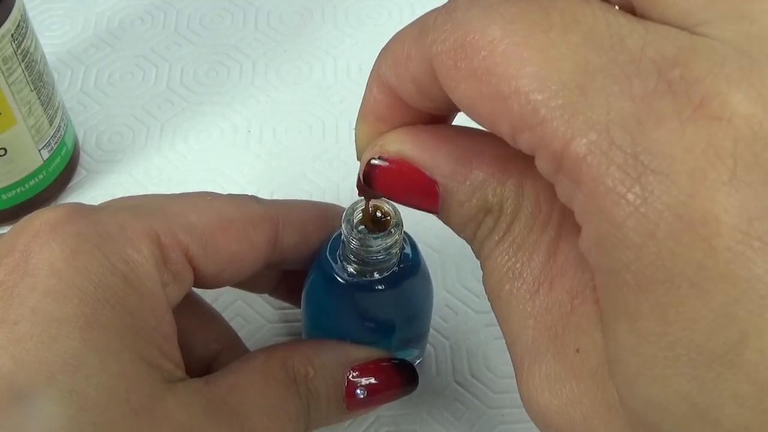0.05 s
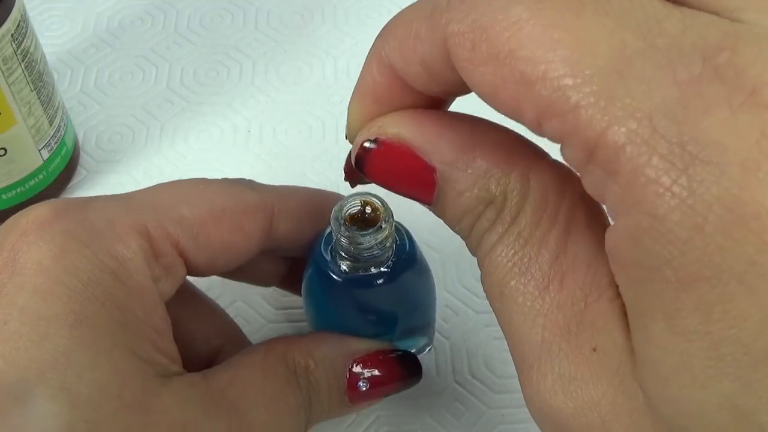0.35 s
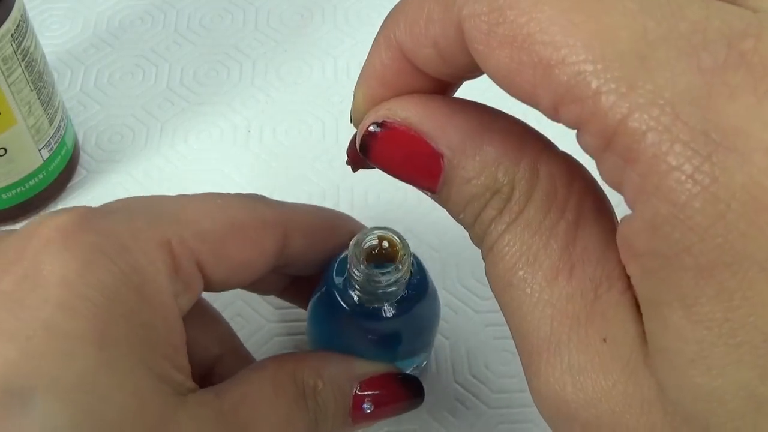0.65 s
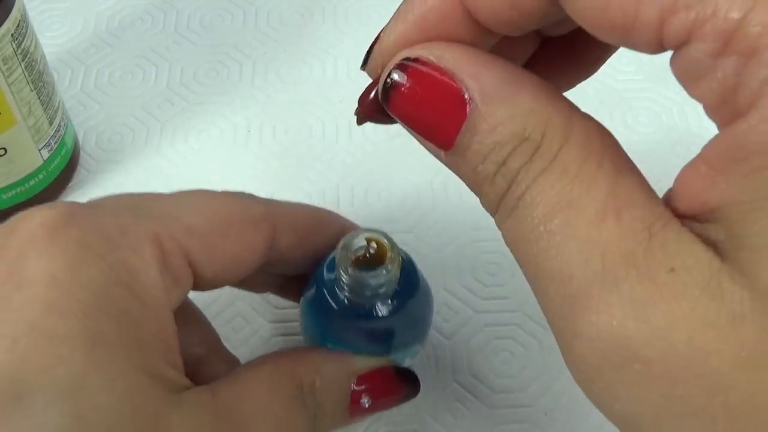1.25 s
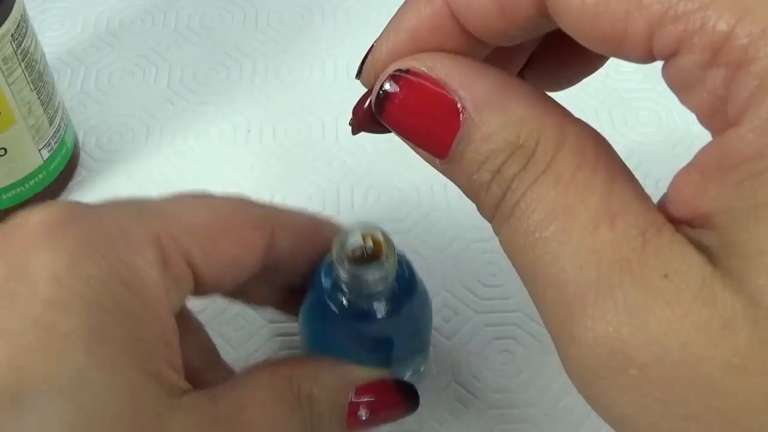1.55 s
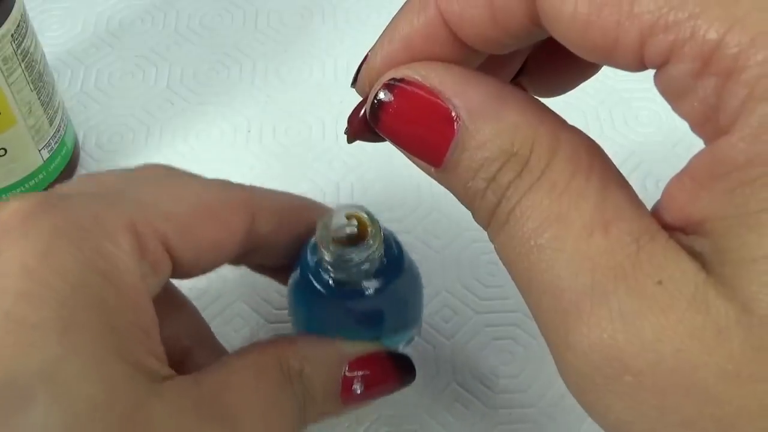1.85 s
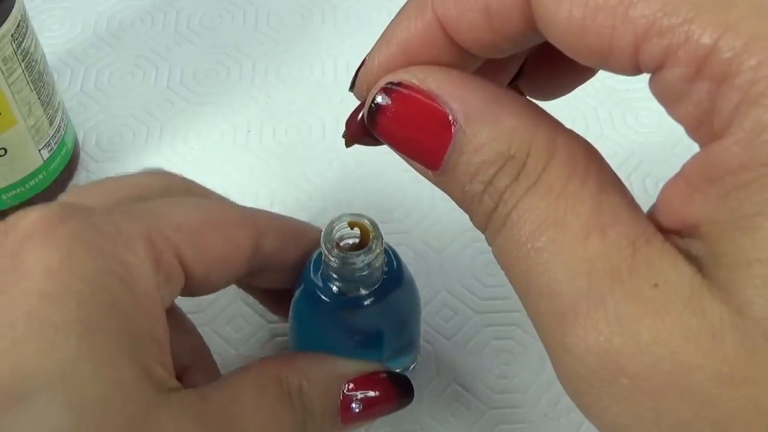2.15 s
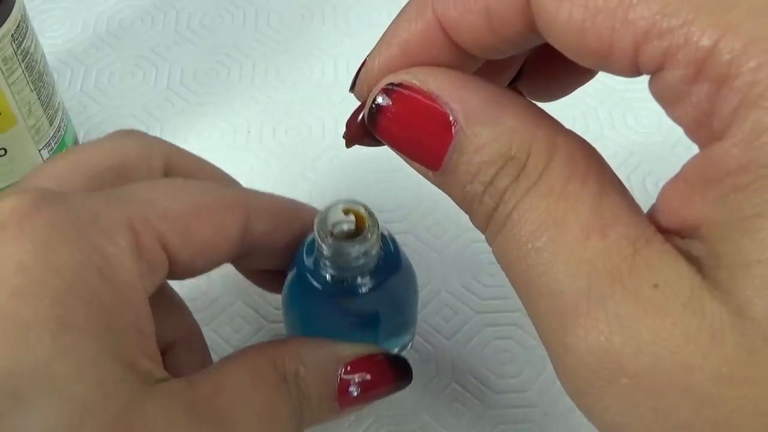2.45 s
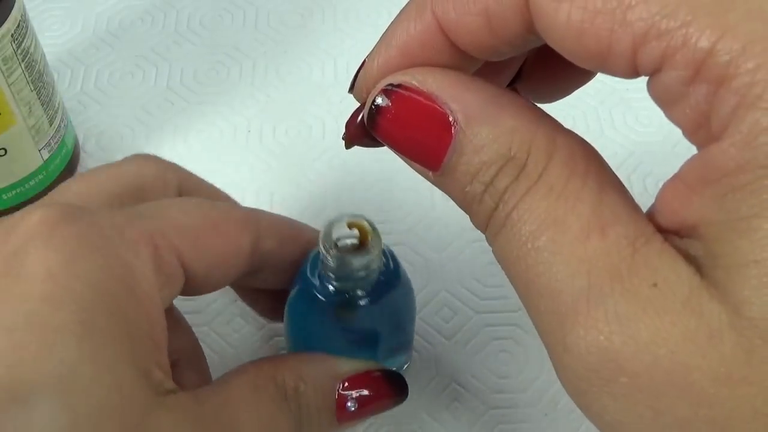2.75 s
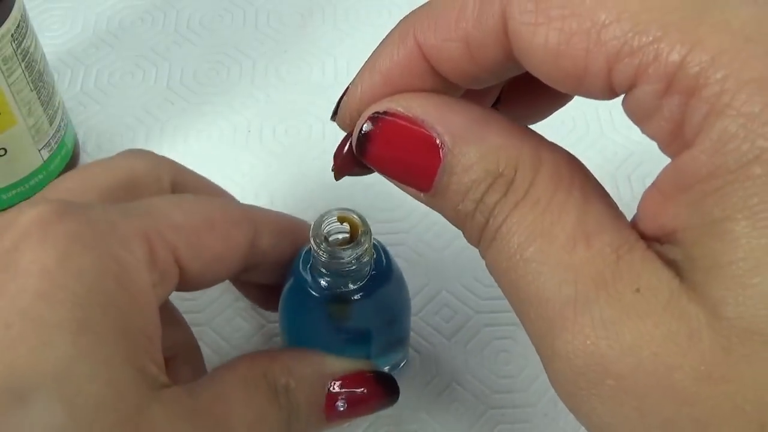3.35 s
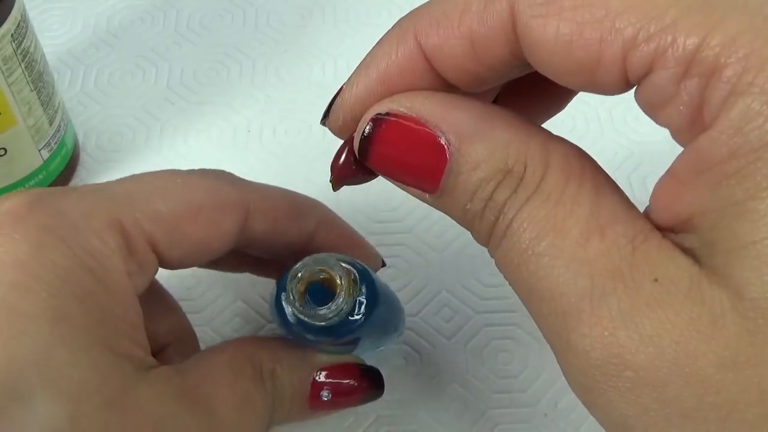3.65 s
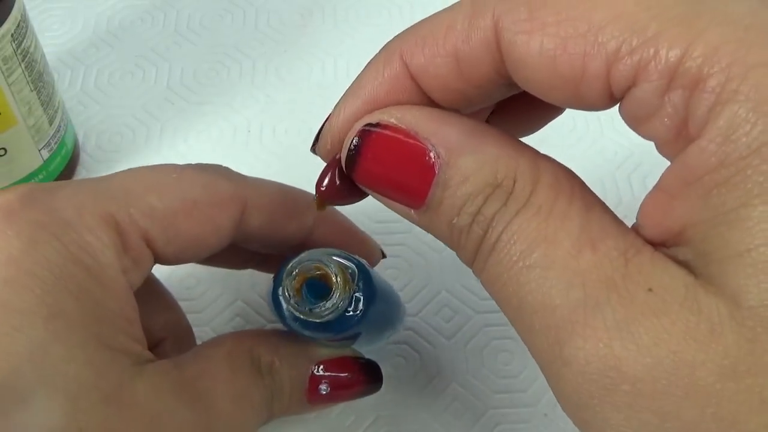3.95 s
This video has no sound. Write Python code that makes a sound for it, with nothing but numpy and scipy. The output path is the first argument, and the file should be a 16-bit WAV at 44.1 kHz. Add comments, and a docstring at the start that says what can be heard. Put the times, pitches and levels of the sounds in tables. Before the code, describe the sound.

A small glass bottle taps on a table covered with a paper towel, heard close up. The taps start softly at about 0.7 seconds and come five times a second, each a hollow thump with a light tick and a faint paper crinkle. They grow louder, peak near 3 seconds and stop around 3.2. A finger gives one short, dull rub at 3.6. Faint room hiss and buzz continue throughout.

```python
"""Over a faint hiss and buzz, a small glass nail-polish bottle taps about five times a second.
It lands on a table covered with a paper towel: the glass gives a short tick and the tabletop rings
with a hollow thump. The paper crinkles each time the bottle lifts. At the end a finger shifts on it.
The room is small and quiet; the hiss comes from the room and the camera, the buzz from the camera."""
import sys
import numpy as np
from scipy import signal
from scipy.fft import rfft, irfft, next_fast_len
from scipy.io import wavfile

SR = 44100
rng = np.random.default_rng(int(sys.argv[2]) if len(sys.argv) > 2 else 0)


def output_pcm(signal):
    """Save a mono or channel-first signal as 16-bit PCM at the path in sys.argv[1].

    Samples are clipped to [-1, 1] before scaling.
    """
    pcm = np.clip(np.atleast_2d(signal).T, -1, 1) * 32767
    wavfile.write(sys.argv[1], SR, np.round(pcm).astype(np.int16))


N = 176400

# The bottle's taps. Each row: start in seconds, thump level in dB, tick level in dB,
# crinkle level in dB, hardness as extra dB for the tabletop's higher tones.
TAPS = [(0.6765, -24, -41.5, -59.5, -6.5), (.850, -40, -49, -66, -6), (1.0724, -18.5, -38.5, -61, -1.5),
        (1.2749, -17, -37.5, -58.5, -0.5), (1.4635, -22.5, -40.5, -60.5, -4),
        (1.6506, -10.5, -31, -57, 6.5), (1.8529, -14, -33, -58, 3.5), (2.0452, -15.5, -36.5, -60, -2),
        (2.244, -10.5, -33.5, -54.5, 1.5), (2.4379, -15.5, -33, -62, -6), (2.6218, -15, -34.5, -57.5, -1),
        (2.8303, -10, -29.5, -56.5, 3), (3.0318, -6.5, -33, -53, 4), (3.2225, -9.5, -31.5, -59.5, -1)]


def amp(db):
    """Turn decibels into a number to multiply by."""
    return 10 ** (np.asarray(db) / 20)


def unit(x):
    """Scale a sound to an average (rms) level of 1."""
    return x / np.sqrt(np.mean(x ** 2) + 1e-20)


def along(points, hz):
    """Read a curve of (Hz, value) points at hz, on a logarithmic frequency scale."""
    freqs, values = np.transpose(points)
    return np.interp(np.log(hz + 1), np.log(freqs + 1), values)


def filtered(x, response):
    """Multiply each frequency in x by response(hz)."""
    size = next_fast_len(N + SR // 2)
    return irfft(rfft(x, size) * response(np.fft.rfftfreq(size, 1 / SR)), size)[..., :N]


def noise(colour):
    """Noise of level 1, its tone colour shaped by (Hz, dB) points."""
    return unit(filtered(rng.standard_normal(N), lambda hz: amp(along(colour, hz))))


def stereo(mid, side):
    """Make left and right from what they share (mid) and how they differ (side)."""
    return np.array([mid + side, mid - side])


def add(track, start, sound):
    """Mix a sound into a track at start seconds."""
    part = track[max(round(start * SR), 0):][:len(sound)]
    part += sound[:len(part)]


def bursts(events, t60, colour, side_db, rise_s=0.0004):
    """A burst of noise for each (seconds, dB) event; t60 is the seconds it takes to fade by 60 dB."""
    level, t = np.zeros(N), np.arange(SR // 5) / SR
    for start, db in events:
        add(level, start, (1 - np.exp(-t / rise_s)) * amp(db - 60 * t / t60))
    return level * stereo(noise(colour), amp(side_db) * noise(colour))


def hiss(level_db=-55):
    """The room and the microphone make a soft, steady noise."""
    # Each row: frequency in Hz, relative level in dB.
    colour = [(13, -37), (22, -19), (55, -3.5), (79, -9.5), (97, -22.5), (143, -6.5), (211, -18.5),
              (311, -17.5), (471, -22), (509, -21), (677, -24), (1260, -22.5), (1680, -27.5), (2680, -29.5),
              (10900, -39.5), (14200, -79.5), (22000, -120)]
    # Each row: frequency in Hz, how alike left and right are (1 means the same).
    likeness = [(60, 1.0), (170, 1), (480, 0.36), (1370, 0.073), (3890, 0.36), (11000, 0.87)]

    def mid_and_side(hz):
        angle = np.arccos(np.clip(along(likeness, hz), -1, 1)) / 2
        return amp(along(colour, hz)) * [np.cos(angle), np.sin(angle)]

    mid, side = filtered(rng.standard_normal((2, N)), mid_and_side)
    return amp(level_db) * unit(stereo(mid, side))


def hand_rumble():
    """Hands on the table make a low rumble that swells and fades."""
    # Each row: frequency in Hz, relative level in dB.
    colour = [(20, -45), (35, -21), (50, 0), (75, 0), (110, -17), (250, -28), (1000, -96)]
    # Each row: time in seconds, rumble level in dB.
    loudness = [(0, -64), (1.2, -62.5), (2.1, -57.5), (2.75, -50), (3.1, -58), (3.55, -65), (3.72, -49),
                (4, -66)]
    level = amp(np.interp(np.arange(N) / SR, *np.transpose(loudness)))
    return level * stereo(noise(colour), amp(-23) * noise(colour))


def camera_buzz(pulse_hz=29.97, level_db=-72.5, scatter_db=2):
    """Faint, regular pulses make the camera's body ring."""
    # The body's tones. Each row: frequency in Hz, relative level in dB, seconds to fade by 60 dB.
    body_tones = [(2664, 3.5, 0.068), (2702, -3.5, 0.027), (2976, 0.5, 0.056), (3366, 2.5, 0.04),
                  (3467, -1, 0.062)]
    pulses, t = np.zeros(N), np.arange(SR // 10) / SR
    ring = sum(amp(db - 60 * t / t60) * np.sin(2 * np.pi * hz * t) for hz, db, t60 in body_tones)
    for start in np.arange(0, N / SR, 1 / pulse_hz):
        add(pulses, start, amp(scatter_db * rng.standard_normal()) * ring)
    return amp(level_db) * unit(pulses)


def glass_ticks(lead_s=0.0015, firm_tap_db=-9.5):
    """Fingers stop the glass from ringing, so it only ticks and clicks; firmer taps clack louder."""
    # Small clicks of the glass rocking and of nails on it. Each row: start in seconds, level in dB.
    clicks = [(0.523, -52), (0.6534, -37.5), (.9002, -47), (0.9127, -40), (0.9145, -46), (1.006, -50),
              (1.0895, -42), (1.118, -53), (1.3397, -57), (1.51, -45), (1.6726, -37), (1.873, -37),
              (1.9049, -33.5), (2.0943, -40.5), (2.1093, -41), (2.4866, -38), (2.499, -45), (2.674, -43),
              (2.6846, -39), (3.0804, -45), (3.3671, -48.5)]
    # The colour of a tick. Each row: frequency in Hz, relative level in dB.
    glass = [(500, 4.5), (1200, -6), (2400, -16), (3400, -1.5), (4200, -7), (5300, 0), (6800, 2),
             (8000, -0.5), (11000, -11.5)]
    # The colour of a clack through the paper. Each row: frequency in Hz, relative level in dB.
    clack_colour = [(300, -9), (600, -2.5), (900, -1), (1600, -13), (3000, -12), (8000, -35)]
    ticks = [(start - lead_s, db) for start, _, db, _, _ in TAPS]  # just ahead of the thump
    tails = [(start, db - 19) for start, db in ticks]
    tails += [(start, db - 25.5) for start, db in clicks]  # the small clicks are drier
    clacks = [(start, -50 + 1.06 * (db - firm_tap_db)) for start, db, _, _, _ in TAPS]
    return (bursts(ticks, t60=0.011, colour=glass, side_db=-17.5)
            + bursts(clicks, t60=0.01, colour=glass, side_db=-17.5)
            + bursts(tails, t60=0.12, colour=glass, side_db=-6)
            + bursts(clacks, t60=0.09, colour=clack_colour, side_db=0))


def paper_crinkle(lift_delay_s=0.049, spread_s=0.014, snaps_per_s=1000, scatter_db=3.5):
    """Paper fibres spring back in a swell of tiny snaps when the bottle lifts or brushes them."""
    # The bottle brushes the paper. Each row: loudest moment in seconds, level in dB.
    brushes = [(.595, -61.5), (3.55, -61.5)]
    # The colour of the paper. Each row: frequency in Hz, relative level in dB.
    paper = [(500, -6.5), (2000, -4), (3500, -1.5), (5500, -6), (7500, -2), (9500, -4), (11000, -11)]
    t = np.arange(N) / SR
    swells = [(start + lift_delay_s, db) for start, _, _, db, _ in TAPS] + list(brushes)
    level = sum(amp(db) * np.exp(-0.5 * ((t - peak) / spread_s) ** 2) for peak, db in swells)
    sizes = amp(scatter_db * rng.standard_normal((2, N))) * rng.choice([-1, 1], (2, N))
    snaps = sizes * (rng.random((2, N)) < snaps_per_s / SR)
    mid, side = filtered(snaps, lambda hz: amp(along(paper, hz)))
    return level * stereo(unit(mid), amp(-9.5) * unit(side))


def table_thumps(rise_s=0.0054, high_from_hz=365, scatter_db=4.2):
    """Every tap rings the same tabletop; a harder hit brings out its higher tones."""
    # The tones of each thump: mostly the tabletop's, while the long, low ones near 92 and 149 Hz ring in the
    # room. Each row: frequency in Hz, relative level in dB, seconds to fade by 60 dB.
    tones = [(92, -32.5, .42), (114, -10, 0.054), (245.4, 6.5, 0.077), (149.5, -23, 0.45),
             (279.8, -7, 0.12), (164.6, -2.5, 0.09), (388.6, -12, 0.057), (311.2, -26.5, 0.5),
             (530, -12, 0.033), (712.4, -33.5, 0.076), (797, -42.5, 0.081), (346.7, -25, 0.29),
             (590, -46, 0.11), (436, -12, 0.033)]
    thumps, t = np.zeros(N), np.arange(int(0.6 * SR)) / SR
    rings = np.array([(-1) ** (k + 1) * amp(db - 60 * t / t60) * np.sin(2 * np.pi * hz * t)
                      for k, (hz, db, t60) in enumerate(tones)])  # every other wave is flipped
    is_high = np.array([hz > high_from_hz for hz, _, _ in tones])
    for start, db, _, _, hardness_db in TAPS:
        extra_db = hardness_db + scatter_db * rng.standard_normal(len(tones))
        gains = amp(db + is_high * extra_db)
        add(thumps, start, gains @ rings * (1 - np.exp(-t / rise_s)))
    return thumps


def room_echoes(x, low_hz=200, high_hz=470, tail_t60=0.2):
    """The walls send back the band from low_hz to high_hz, and a short, soft wash of echoes follows."""
    # Echoes from the walls. Each row: delay in seconds, level in dB.
    walls = [(.0228, -12.5), (0.0312, -11.5), (0.0454, -17), (0.0915, -25.5), (.0991, -22.5), (0.1185, -27)]
    mid, t = x.copy(), np.arange(SR // 2) / SR
    echo = filtered(x, lambda hz: 1 / (1 + (low_hz / (hz + 1)) ** 6) / (1 + (hz / high_hz) ** 4))
    for delay, db in walls:
        add(mid, delay, amp(db) * echo)
    tails = rng.standard_normal((2, len(t))) * amp(-60 * t / tail_t60)
    tails /= np.linalg.norm(tails[0])
    wash_mid, wash_side = signal.fftconvolve(x[None], tails, axes=1)[:, :N]
    return stereo(mid + amp(-32.5) * wash_mid, amp(-18.5) * wash_side)


def finger_rub(start_s=3.631, level_db=-42.5, rise_s=0.0012, t60=0.15):
    """A finger slips once on the bottle with a short, dull rub."""
    # The colour of skin on glass. Each row: frequency in Hz, relative level in dB.
    skin = [(150, -19), (420, 8.5), (800, 1), (1050, -10), (1350, 2), (1650, -5.5), (2100, 0.5),
            (2800, -20), (6000, -30)]
    t = np.maximum(np.arange(N) / SR - start_s, 0)
    level = amp(level_db - 60 * t / t60) * (1 - np.exp(-t / rise_s))
    return level * stereo(noise(skin), 0.5 * noise(skin))


def scene(lean_db=0.28):
    """Mix the close-up taps with the quiet background; the thump leans a touch to the left."""
    thumps = room_echoes(table_thumps()) * amp([[lean_db], [-lean_db]])
    return thumps + glass_ticks() + paper_crinkle() + finger_rub() + hiss() + hand_rumble() + camera_buzz()


def record(dry, top_hz=11050):
    """The camera cuts the treble above top_hz; only a faint trace just above it gets through."""
    def response(hz):
        steep_cut = 1 / np.sqrt(1 + (hz / top_hz) ** 200)
        trace = amp(-27) * (hz > top_hz) * (hz < 15300)
        return steep_cut + trace

    return filtered(dry, response)


dry = scene()
out = record(dry)
output_pcm(out)
```